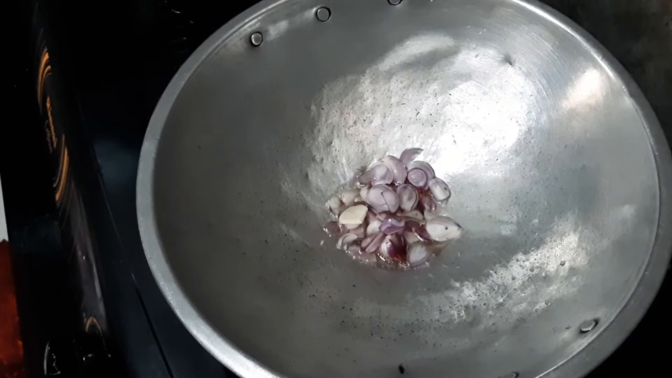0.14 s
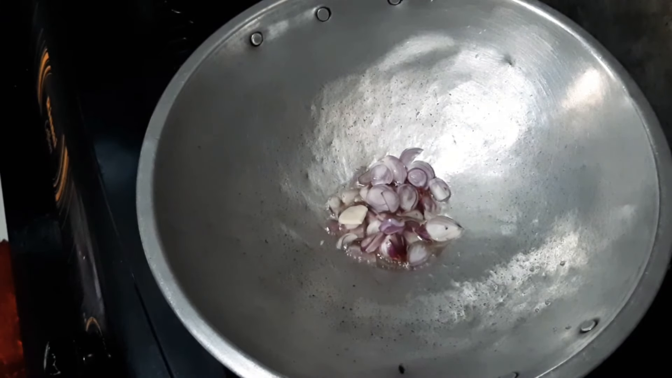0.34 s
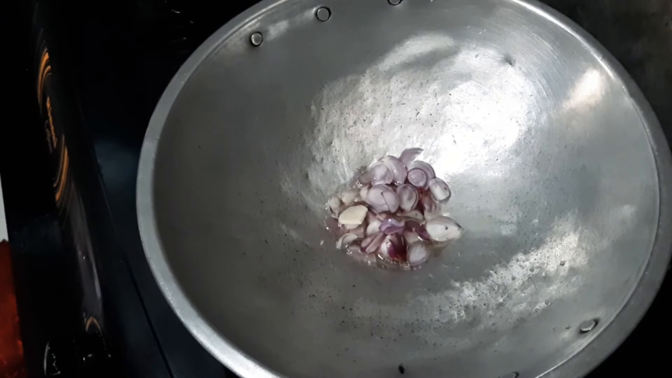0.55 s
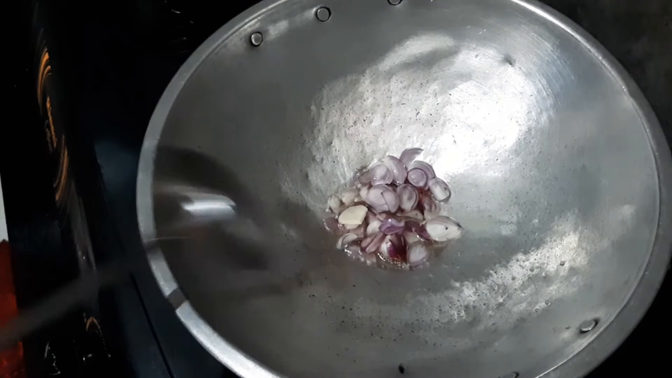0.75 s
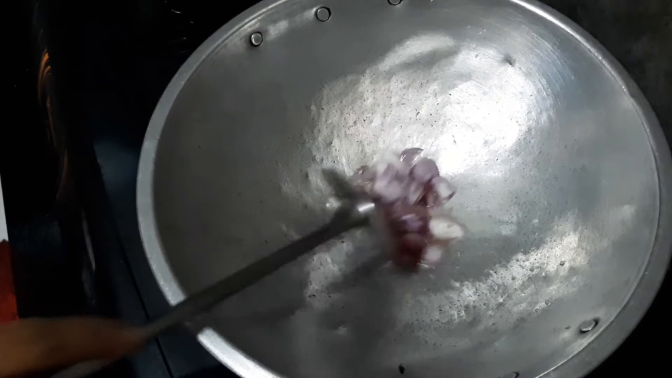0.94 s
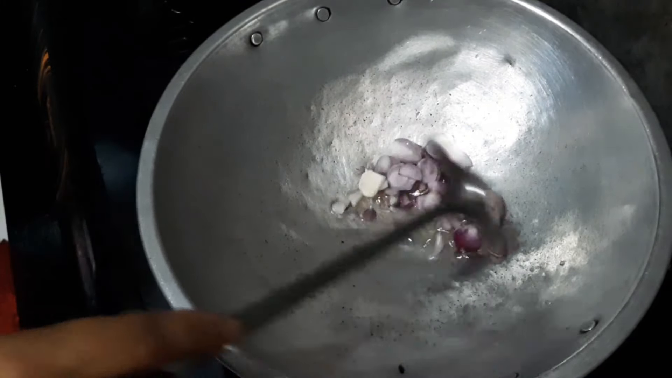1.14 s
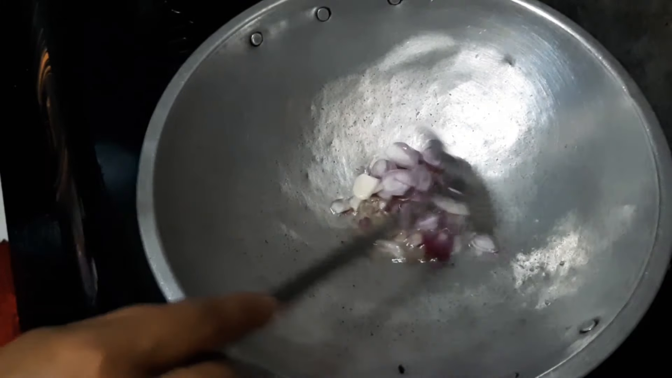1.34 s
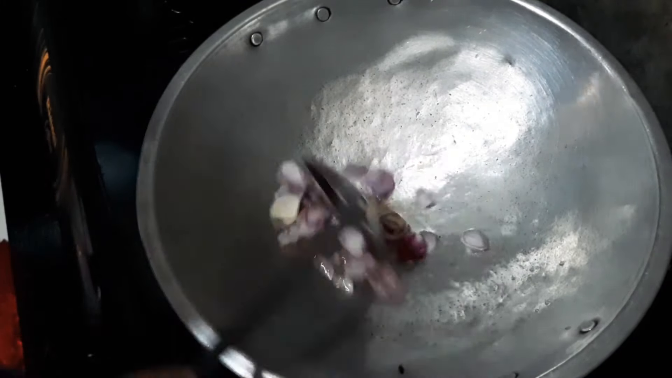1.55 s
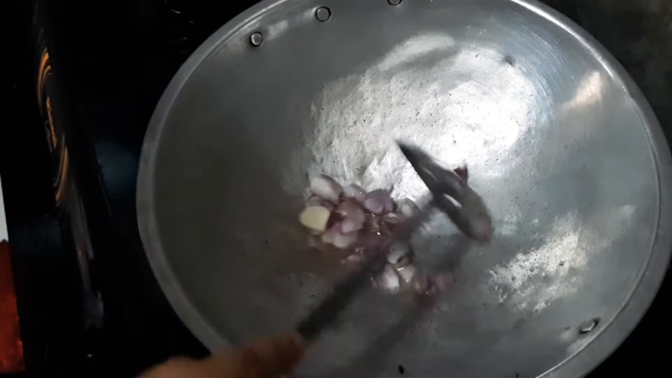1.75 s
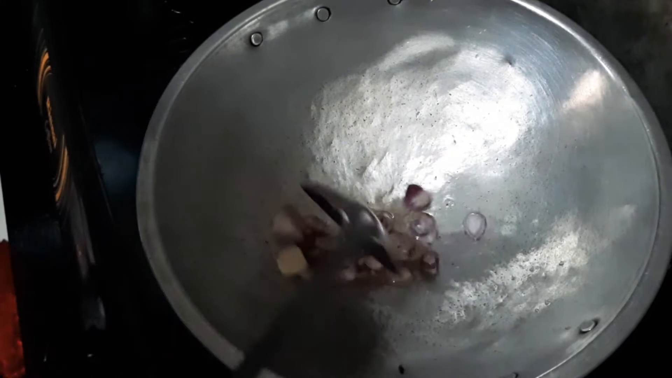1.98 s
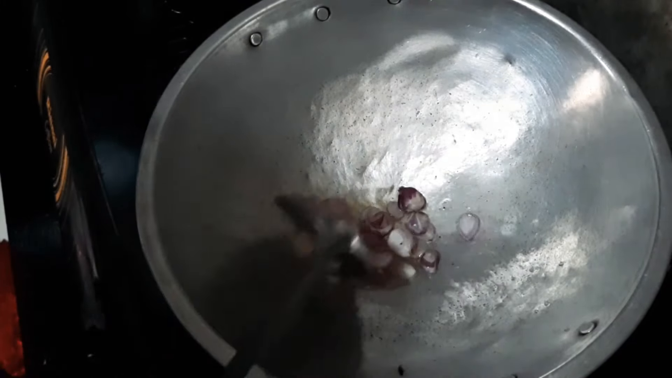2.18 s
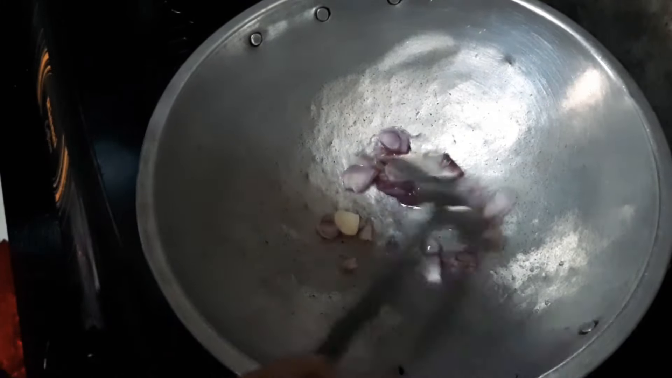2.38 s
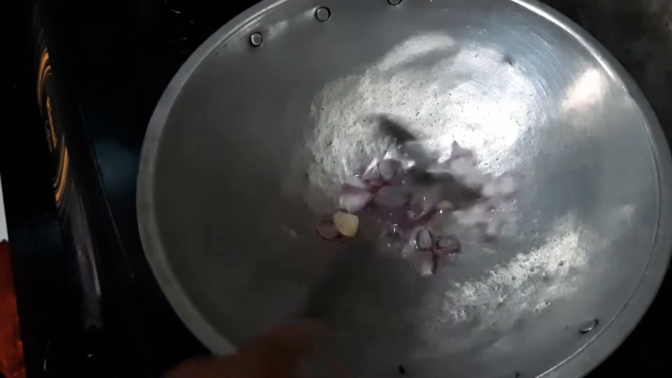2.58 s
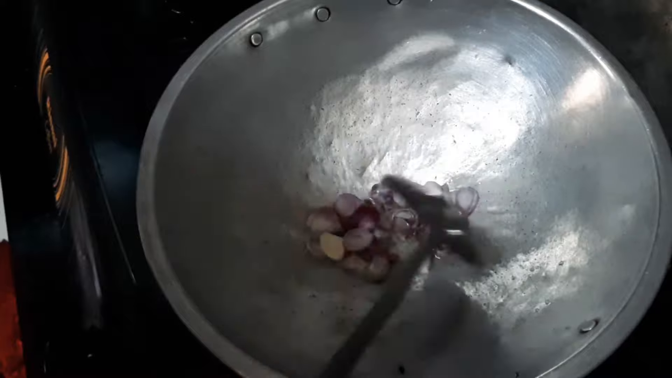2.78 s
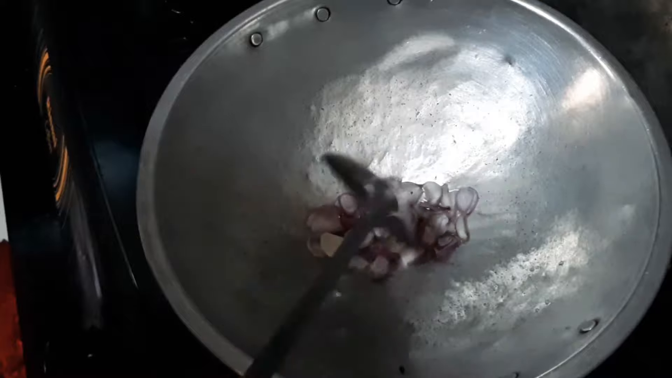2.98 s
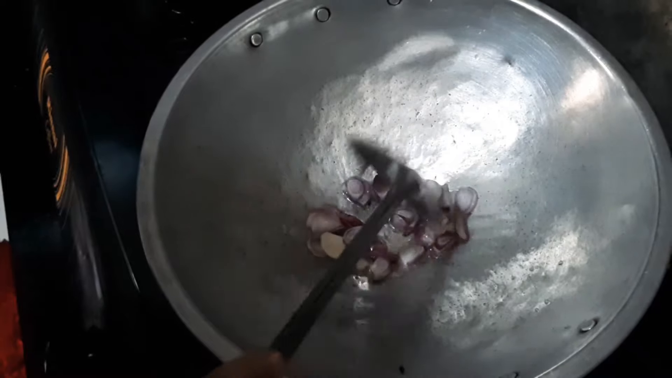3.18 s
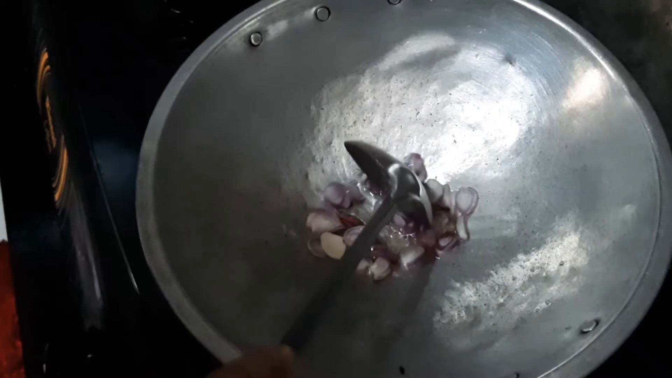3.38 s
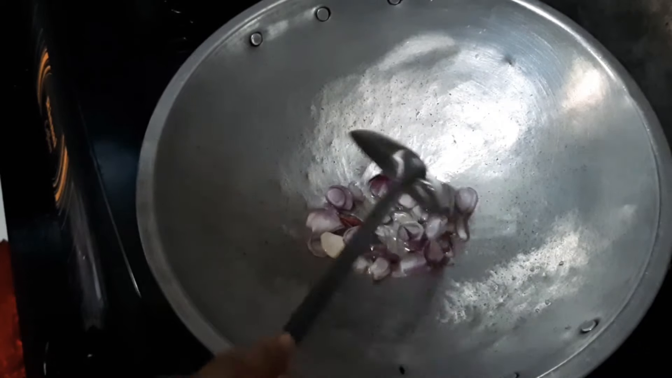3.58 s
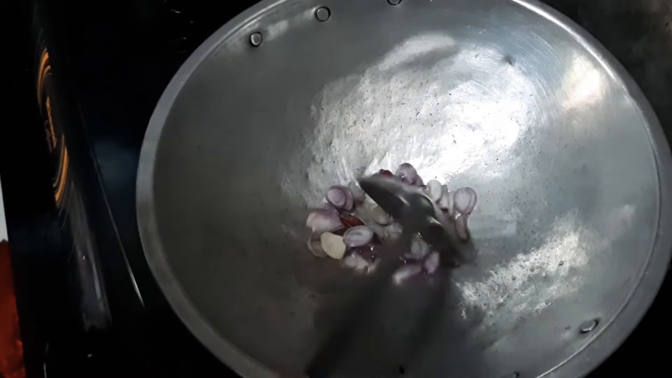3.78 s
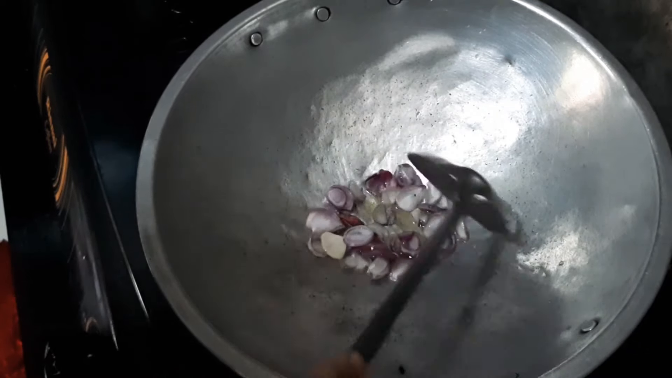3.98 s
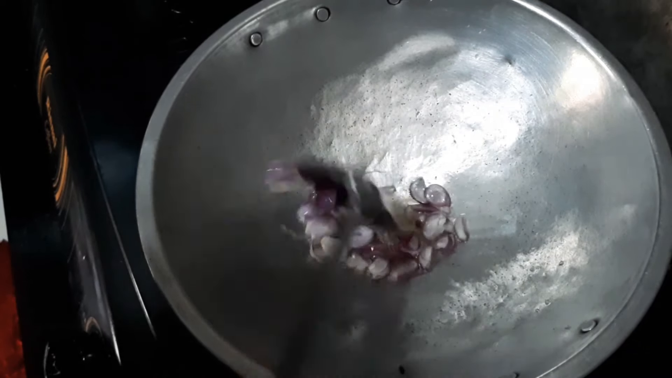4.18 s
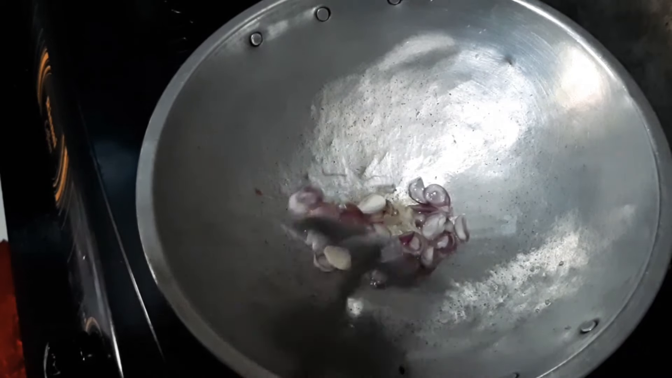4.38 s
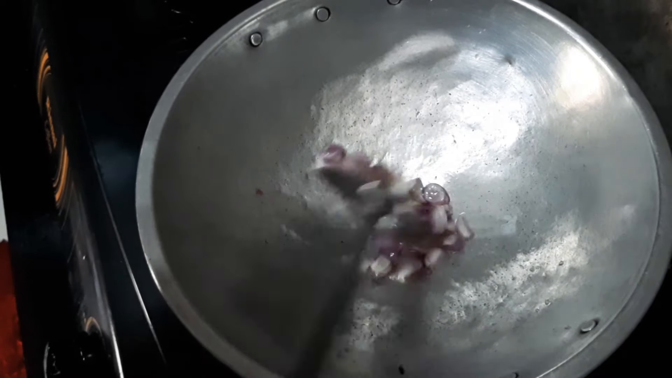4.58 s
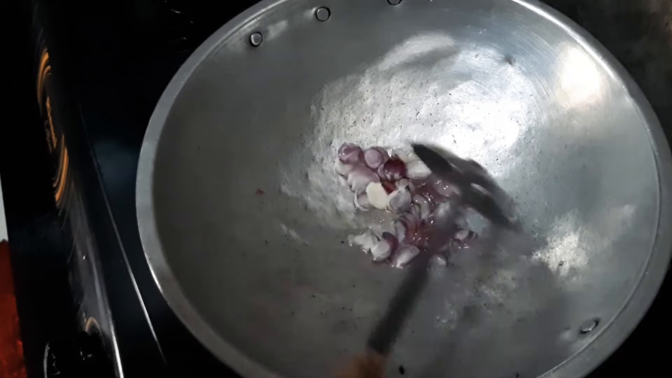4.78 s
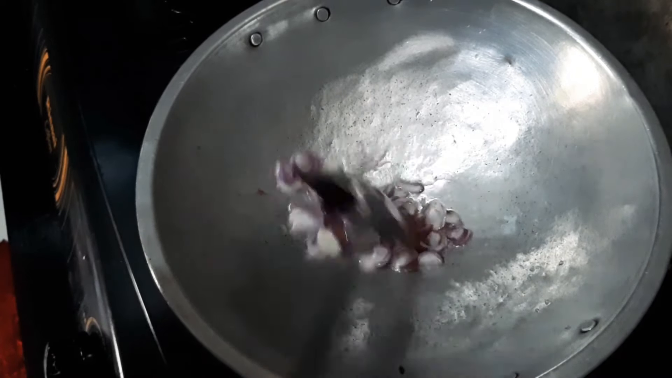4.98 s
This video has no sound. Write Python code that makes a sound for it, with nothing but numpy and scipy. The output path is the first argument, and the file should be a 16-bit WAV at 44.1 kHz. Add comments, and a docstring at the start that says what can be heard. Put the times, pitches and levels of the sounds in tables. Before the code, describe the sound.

Shallots and garlic fry in a thin metal wok with a bright, crackling sizzle and sharp oil spits over a faint low burner hum. After a soft early thud, a metal spatula clanks in at about one second, then knocks, scrapes and stirs repeatedly to the end. The frying grows fiercer around two seconds. Close indoor kitchen pickup in stereo, with wide treble and centred bass.

```python
"""A dense fizz comes first: steam bubbles bursting in hot oil as sliced shallots fry, patchy filtered noise with pops.
Burner and kitchen hum faintly below as bass-heavy noise; louder spits are short noise bursts with a resonance.
After a short early thud, a slotted spatula knocks and scrapes the thin metal wok: clicks ring damped modes for all.
Low noise resonances rumble with the contacts. Two microphones a few centimetres apart hear the bass alike
and the treble apart."""
import sys
import numpy as np
from scipy import signal
from scipy.io import wavfile

SR = 44100
rng = np.random.default_rng(int(sys.argv[2]) if len(sys.argv) > 2 else 0)


def store_pcm(level_fs):
    """Save levels as 16-bit WAV."""
    pcm = np.round(np.clip(level_fs, -1, 1) * 32767).astype(np.int16)
    wavfile.write(sys.argv[1], SR, np.atleast_2d(pcm).T)


N = 222018


def amp(db):
    """Logarithmic level: convert decibels to an amplitude gain."""
    return 10 ** (np.asarray(db) / 20)


def rms_one(x):
    """Energy normalisation: scale a signal to an rms of 1."""
    return x / np.sqrt(np.mean(x ** 2) + 1e-20)


def at_hz(points, hz):
    """Pitch is logarithmic: interpolate a table of (Hz, value) on a log-frequency axis."""
    table_hz, values = np.array(points).T
    return np.interp(np.log(hz), np.log(table_hz), values)


def in_time(rows):
    """Piecewise-linear envelopes: the first column is seconds, the others become curves."""
    s, *columns = np.transpose(rows)
    return [np.interp(np.arange(N) / SR, s, c) for c in columns]


def drift(rate_hz):
    """Slow random modulation: white noise through two equal low-pass poles, with rms 1."""
    step = 40   # samples between slow values
    r = np.exp(-2 * np.pi * step * rate_hz / SR)
    noise = rng.standard_normal(N // step + 2002)
    slow = signal.lfilter([1], [1, -2 * r, r * r], noise)[2000:]   # drop the filter's start
    return np.interp(np.arange(N) / step, np.arange(len(slow)), rms_one(slow))


def dying(clicks, t60):
    """Exponential decay: each click starts an envelope that falls 60 dB in t60 seconds."""
    return signal.lfilter([1], [1, -amp(-60 / (t60 * SR))], clicks + 1e-18)


def ring(x, hz, t60):
    """Damped oscillator: a unit click sets a sine ringing that falls 60 dB in t60 seconds."""
    r, w = amp(-60 / (t60 * SR)), 2 * np.pi * hz / SR
    return signal.lfilter([0, np.sin(w)], [1, -2 * r * np.cos(w), r * r], x + 1e-18)


def clicks_at(times, levels_db):
    """Impulsive excitation: single-sample clicks at given seconds and levels."""
    out = np.zeros(N)
    out[(np.asarray(times) * SR).astype(int)] = amp(levels_db)
    return out


def grit(per_s, spread_db, most=3.2):
    """Random point process: clicks whose size in dB is exponentially spread, up to a limit."""
    size_db = spread_db * np.minimum(rng.exponential(1, N), most)
    return (rng.random(N) < per_s / SR) * amp(size_db)


def bands(spectrum, low_hz, count, gain):
    """Filter bank with partial coherence: half-octave noise bands, each played by gain(Hz)."""
    # Each row: frequency in Hz, correlation of left and right from 0 to 1.
    likeness = [(60, 1), (290, 0.8), (640, 0.53), (1410, 0.023), (3100, 0.)]
    out, white = 0, rng.standard_normal((2, 2, N))
    for k in range(count):
        low, high = low_hz * 2 ** (k / 2), low_hz * 2 ** ((k + 1) / 2)
        hz = np.sqrt(low * high)
        band = signal.butter(2, [low, min(high, .45 * SR)], "band", fs=SR, output="sos")
        mid, side = signal.sosfilt(band, white[k % 2])   # neighbours use different noise
        alike = np.clip(at_hz(likeness, hz), -1, 1)
        stereo = np.sqrt(1 + alike) * mid + np.sqrt(1 - alike) * side * [[1], [-1]]
        out = out + amp(at_hz(spectrum, hz)) * gain(hz) * stereo
    return rms_one(out)


def fizz():
    """Incoherent sum: countless tiny bursts merge to a hiss; larger bubbles pop, each with its own colour."""
    # Vigour of the frying. Each row: time in seconds, relative level in dB.
    vigour = [(0.0, -38.5), (0.88, -40.5), (0.93, -32), (1.23, -34.5), (1.38, -35), (1.45, -31),
              (2.01, -26.5), (2.13, -29.5), (2.43, -28.5), (2.55, -33.5), (2.65, -27), (2.78, -35),
              (3.4, -34), (4.04, -35.5), (4.17, -30), (4.54, -34), (4.83, -28.5), (5.03, -31.5)]
    # Spectrum of the hiss. Each row: frequency in Hz, relative density in dB per Hz.
    hiss_spectrum = [(710, -45), (1200, -2), (1360, -7), (1550, -9.5), (2260, -5), (2540, 0.5), (3390, 0),
                     (3810, -3), (4240, 1.5), (9370, -6.5), (11200, -8.5), (15500, -2)]
    # The hollow of the bowl lifts the hiss a little. Each row: resonance in Hz, share added as a factor.
    hollows = [(3300, 0.34), (7800, 0.45), (11800, 0.23)]
    level_db = in_time(vigour)[0]
    fiercer_db = level_db - level_db.mean()
    pops, together = grit(per_s=260., spread_db=4.5, most=1.7), drift(13.7)
    at = np.flatnonzero(pops)

    def gain(hz):
        """Amplitude modulation: patchy hiss plus pops that grow with frequency up to 8 kHz."""
        coloured = np.zeros(N)
        coloured[at] = pops[at] * amp(9.3 * np.clip(rng.standard_normal(len(at)), -2, 1.2))
        share = amp(-3.0) * np.clip(hz / 8000, 0, 1)
        tilt_db = 0.17 * fiercer_db * np.log2(hz / 4000)   # a fiercer fizz is brighter
        restless = np.clip(1.01 + 0.057 * fiercer_db, 0, 1)   # a quiet fizz is steadier
        patchy_db = restless * (1.93 * together + 1.8 * drift(13.4))
        return amp(tilt_db + patchy_db) * (1 + share * dying(coloured, t60=0.0016))

    hiss = bands(hiss_spectrum, low_hz=989, count=8, gain=gain)
    hiss = hiss + sum(share * signal.lfilter(*signal.iirpeak(hz, 7., fs=SR), hiss) for hz, share in hollows)
    top = signal.cheby2(14, 40, 15900, fs=SR, output="sos")   # low-pass, 40 dB down from 15900 Hz
    balance = amp([[.4], [-.4]])   # left a little louder than right
    return amp(level_db) * signal.sosfilt(top, hiss) * balance


def hum():
    """Broadband background noise: burner and kitchen, each band wavering by itself."""
    # Each row: frequency in Hz, relative density in dB per Hz.
    hum_spectrum = [(18, -50), (30, -36), (113, -5.5), (202, -18.5), (382, 3), (454, -5.5), (572, -2.5),
                    (1040, -5.5), (1590, -11), (3000, -22), (3900, -40)]
    waver = lambda hz: amp(3.43 * drift(8.8))
    return amp(-42.5) * bands(hum_spectrum, low_hz=30.52, count=13, gain=waver)


def spits():
    """Impulse and reverberant decay: a sharp crack, then a fainter wash of echoes round the bowl."""
    # The loudest spits. Each row: start in seconds, peak of the two-channel mean in dB,
    # resonance in Hz set by the size of the bubble.
    loud_spits = [(0.1278, -13, 11000), (0.147, -15, 7900), (0.192, -22, 12500), (0.374, -18, 13400),
                  (0.661, -16, 11000), (1.1684, -15, 7900), (1.5633, -13.5, 10800), (1.5854, -5.5, 4100),
                  (1.613, -26, 9000), (1.8166, -10, 5670), (1.8413, -10, 4780), (1.87, -12, 10500),
                  (1.988, -9.5, 11100), (2.02, -8.5, 5000), (2.065, -33, 13000), (2.0888, -11, 11470),
                  (2.1644, -8, 11400), (2.227, -11, 10200), (2.245, -10.5, 11500), (2.322, -5.5, 12700),
                  (2.413, -12.5, 7310), (2.4344, -13.5, 11100), (2.454, -8, 11800), (2.5019, -6, 8500),
                  (2.667, -15, 5260), (2.68, -13, 7940), (2.871, -17, 12100), (2.884, -14, 11600),
                  (2.9347, -18.5, 10500), (2.9939, -11.5, 8400), (3.131, -15, 5130), (3.168, -15, 11900),
                  (3.186, -18, 11500), (3.473, -13, 8350), (3.57, -9.5, 7640), (3.676, -15, 11700),
                  (3.8109, -13, 7900), (3.9695, -16, 8000), (4.0134, -15, 11600), (4.0738, -8, 2960),
                  (4.2803, -17, 12500), (4.286, -9.5, 11000), (4.3043, -9.5, 8600), (4.309, -12.5, 8240),
                  (4.3595, -14, 10100), (4.3867, -10.5, 5300), (4.4052, -14, 14400), (4.4282, -10.5, 13100),
                  (4.809, -10.5, 9930), (4.8743, -9.5, 12800), (4.8914, -17, 5700)]
    rise_s, t60_s, wash_db, wash_t60_s = 0.0015, 0.012, -9, 0.077
    out, t = np.zeros((2, N)), np.arange(2000) / SR - rise_s
    decay = amp(-60 * t / t60_s) + amp(wash_db) * amp(-60 * t / wash_t60_s)
    shape = np.where(t < 0, amp(-15.0), decay)   # a faint lead-in comes before the crack
    balance = amp([[.8], [-.8]])   # left a little louder than right
    for s, level_db, hz in loud_spits:
        noise = rng.standard_normal((2, len(t))) * shape
        noise[:, np.argmin(t < 0)] = 8.6   # the wall of the bubble snaps
        noise[1] = np.roll(noise[1], rng.integers(0, 3))   # right lags by 0 to 2 samples
        bright = signal.sosfilt(signal.butter(2, 0.29 * hz, "high", fs=SR, output="sos"), noise)
        tone = signal.lfilter(*signal.iirpeak(hz, 3., fs=SR), noise)
        burst = (amp(-4.5) * bright + 1.7 * tone) * balance
        burst = amp(level_db) * burst / abs(burst.mean(axis=0)).max()
        i = int(s * SR)
        out[:, i:i + len(t)] += burst[:, :N - i]
    return out


def rubbing():
    """Friction envelopes added as powers: drag, scratch and rumble levels, and gain of the outer bowl modes."""
    # Rubbing contacts: first a short thud, then strokes of the spatula over the bowl.
    # Each row: start in seconds, length in seconds, relative drag level at start in dB, the same at end in dB,
    # gain of the outer bowl modes in dB (in the strokes low under food, high on bare metal),
    # edge scratch over drag in dB, rumble over drag in dB.
    contacts = [(0.209, 0.075, -43.5, -47.5, 6.5, -6, -1), (0.944, 0.033, -36.5, -30, 4, -7.5, -11),
                (1.295, 0.21, -30.5, -43.5, -5.5, -5, -8), (1.666, 0.26, -27.5, -33, -2.5, -2.5, -13.5),
                (2.183, 0.04, -31, -35.5, -4, -9, -9), (2.274, 0.2, -27.5, -36, -1.5, -4.5, -9),
                (2.491, 0.11, -32, -32, -3, -3.5, -11.5), (2.599, 0.052, -33.5, -33.5, 1.5, 8, -9),
                (2.66, 0.12, -32.5, -33.5, -1.5, -16, -9.5), (2.79, 0.09, -41, -41, -9.5, 5, -16),
                (3.138, 0.34, -32.5, -45, -8.5, -3.5, -13), (3.44, 0.2, -36, -43, -4, -15, -11),
                (3.745, 0.081, -41, -30, -9, -9, -12.5), (3.975, 0.02, -32, -40, -3, -30, -11),
                (4.058, 0.3, -41, -38, -10, 1, -8), (4.47, 0.14, -34.5, -37.5, -8.5, -4, -9.5),
                (4.665, 0.1, -34, -40, -1, 1, -10.5), (4.791, 0.11, -30.5, -34, -7, -2.5, -13.5)]
    touch_s, lift_db_per_s = 0.0037, 125   # a contact sets in fast and trails off
    rest_db = -77, -51, -57.5   # drag, scratch and rumble between contacts
    t = np.arange(N) / SR
    power = amp(rest_db)[:, None] ** 2 * np.ones(N)
    for s, length, first_db, last_db, _, scratch_db, rumble_db in contacts:
        drag_db = np.interp(t, [s, s + length], [first_db, last_db])
        drag_db = drag_db - lift_db_per_s * np.maximum(t - s - length, 0)
        pressed = amp(drag_db) * np.clip((t - s) / touch_s, 0, 1)
        power += (amp([0, scratch_db, rumble_db])[:, None] * pressed) ** 2
    middles = [(s + length / 2, outer_db) for s, length, _, _, outer_db, _, _ in contacts]
    return (*10 * np.log10(power), *in_time(middles))


def body(modes, blows, rub_db, rub, lag_ms, damping, blow_db, rubbed_db, chatter_s=None):
    """Modal synthesis: blows and rubbing ring modes that leave the metal at different places."""
    struck, rubbed, at = np.zeros((2, N)), np.zeros((2, N)), np.flatnonzero(blows)
    for k, (hz, level_db, t60) in enumerate(modes):
        uneven = blows * amp(level_db + blow_db(hz))
        uneven[at] *= amp(rng.normal(0, 2.2, len(at)))
        if chatter_s:   # a thin edge chatters on for a moment after it strikes
            unit_energy = np.sqrt(2 * np.log(1000) / (chatter_s * SR))
            uneven = uneven + 0.48 * dying(uneven, chatter_s) * rng.standard_normal(N) * unit_energy
        hit = ring(uneven, hz, t60)
        # the moving contact damps the mode and favours now one, now another
        favour_db = level_db + rubbed_db(hz) + 1.96 * drift(10.1)
        scraped = (-1) ** k * ring(amp(favour_db) * rub, hz, t60 * damping)
        lag = int(rng.uniform(-lag_ms, lag_ms) * SR / 1000)   # one microphone hears the mode first
        struck += [hit, np.roll(hit, lag)]
        rubbed += [scraped, np.roll(scraped, lag)]
    return struck + amp(rub_db) * rms_one(rubbed)


def wok(drag_db, scratch_db, outer_db):
    """Impact and friction excitation: a first thud, then the spatula's slips, knocks, scratches and taps."""
    # Bowl modes, damped by oil and food. Each row: frequency in Hz, relative level in dB,
    # 60 dB decay when struck in seconds.
    bowl_modes = [(199, -12.5, 0.19), (248, -5.5, 0.12), (329, -2.5, 0.098), (400, -1.5, 0.12),
                  (457.6, 0, 0.06), (569, 0, 0.064), (644, 4.5, 0.031), (687, 0.5, 0.046), (778, -5, 0.076),
                  (817, -1.5, 0.019), (1063, -10.5, 0.063), (1349, -13, 0.083), (1742, -10.5, 0.053)]
    # Spatula modes. Each row: frequency in Hz, relative level in dB, 60 dB decay when struck in seconds.
    spatula_modes = [(2770, -1, 0.059), (2950, -3, 0.06), (3180, -0.5, 0.027), (3370, 0, 0.049),
                     (3680, 3, 0.065), (3900, -5, 0.15), (4460, 2, 0.061), (4620, 4, 0.011),
                     (5030, -2.5, 0.034), (6210, -3, 0.011)]
    # Impacts: first the short thud, played through the same modes, then the spatula meeting the bowl.
    # Each row: time in seconds, relative blow to the bowl modes in dB,
    # relative blow to the spatula modes in dB, where those ring most in Hz.
    impacts = [(0.214, -49, -40, 3800), (0.906, -25.5, -17, 3770), (0.935, -35, -27, 3820),
               (1.292, -22, -16.5, 5450), (1.661, -24.5, -20.5, 4770), (1.893, -30.5, -59, 3600),
               (2.271, -20.5, -20.5, 3220), (2.295, -25.5, -39.5, 3400), (2.358, -54, -29, 3420),
               (2.52, -34, -38, 3400), (2.696, -32, -38, 3430), (2.715, -30.5, -37, 3300),
               (2.731, -33, -33, 3400), (3.1112, -42, -31, 4240), (3.226, -47, -42, 3420),
               (3.3184, -51, -23.5, 3640), (3.356, -49, -26, 3400), (3.378, -43, -27, 3370),
               (3.5006, -52, -31, 3400), (3.76, -39, -31, 3320), (3.785, -33, -50, 3320),
               (3.82, -30, -36, 3300), (4.061, -54, -31, 3740), (4.122, -52, -30, 3280),
               (4.808, -49, -30, 3100)]
    s, bowl_db, edge_db, edge_hz = np.transpose(impacts)

    slips = grit(per_s=900., spread_db=3.0, most=3.85) * rng.choice([-1, 1], N)
    # food on the bowl damps the modes outside 280 to 520 Hz
    bare_db = lambda hz: outer_db * (not 280 < hz < 520)
    bowl = body(bowl_modes, clicks_at(s, bowl_db), drag_db, slips, 0.29, 0.59, bare_db, bare_db)
    # the thin bowl radiates no bass
    bowl = signal.sosfilt(signal.butter(3, 170, "high", fs=SR, output="sos"), bowl)

    taps = clicks_at(s, edge_db)
    # where the edge lands decides which modes answer most
    spot_hz = np.interp(np.arange(N) / SR, s, edge_hz)
    near_db = lambda hz: -33. * abs(np.log2(hz / spot_hz))   # dB per octave away
    scrape_db = lambda hz: 0.11 * near_db(hz)
    scratch = grit(per_s=2500., spread_db=3.0) * rng.choice([-1, 1], N)
    edge = body(spatula_modes, taps, scratch_db, scratch, 0.44, 0.11, near_db, scrape_db, chatter_s=0.048)
    # the narrow blade radiates only treble
    edge = signal.sosfilt(signal.butter(2, 2300, "high", fs=SR, output="sos"), edge)

    # each impact begins with a broad crack
    broad = signal.butter(2, [2400, 10000], "band", fs=SR)
    crack = amp(2.5) * dying(taps, t60=0.037) * signal.lfilter(*broad, rng.standard_normal((2, N)))
    return bowl + edge + crack


def stand(rumble_db):
    """Forced resonance: the wok rocks on its stand, as when stirred, a low rumble in three resonances."""
    push = rng.standard_normal(N) + 0.099 * rng.standard_normal((2, N))   # nearly alike in both channels
    low = 0
    # Hz, sharpness Q, relative dB
    for hz, q, db in [(74.7, 6.9, -6.0), (106.3, 4.3, -0.5), (131.0, 1.8, -2.5)]:
        low = low + amp(db) * signal.lfilter(*signal.iirpeak(hz, q, fs=SR), push)
    low = signal.sosfilt(signal.butter(2, [55, 190], "band", fs=SR, output="sos"), low)
    return amp(rumble_db) * rms_one(low)


def scene():
    """Superposition: the sound pressures of all sources add."""
    drag_db, scratch_db, rumble_db, outer_db = rubbing()
    return fizz() + hum() + spits() + wok(drag_db, scratch_db, outer_db) + stand(rumble_db)


def record(dry):
    """Band limiting: the small microphones lose the deepest bass; the top is cut."""
    dry = signal.sosfilt(signal.butter(2, 32, "high", fs=SR, output="sos"), dry)
    # low-pass, 70 dB down from 16656 Hz
    return signal.sosfilt(signal.cheby2(12, 70, 16656, fs=SR, output="sos"), dry)


dry = scene()
out = record(dry)
store_pcm(out)
```